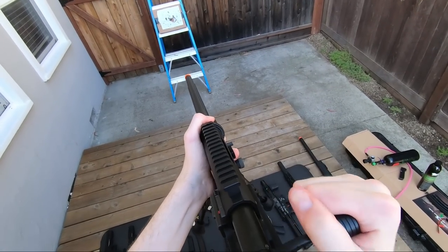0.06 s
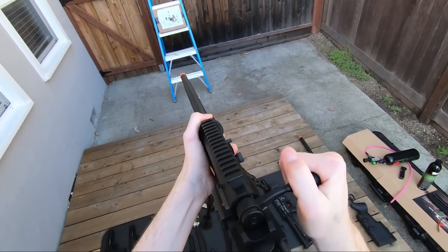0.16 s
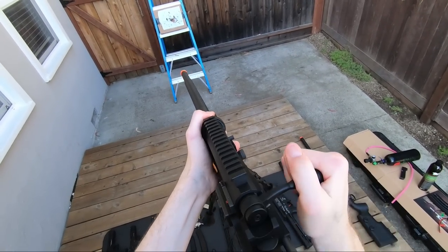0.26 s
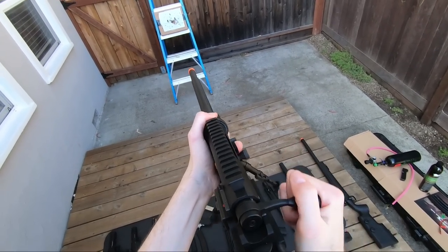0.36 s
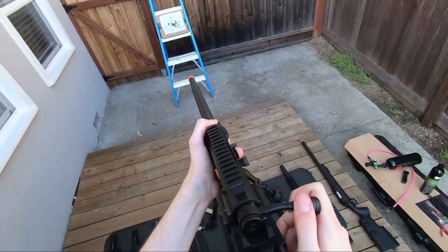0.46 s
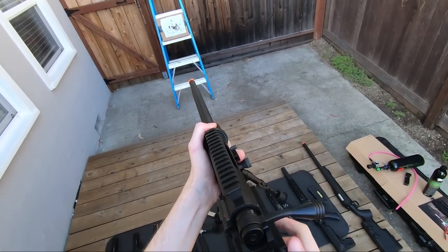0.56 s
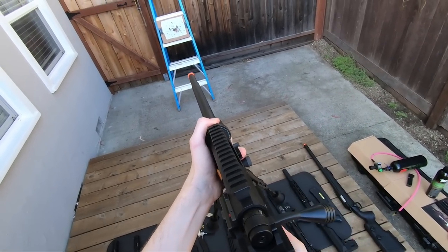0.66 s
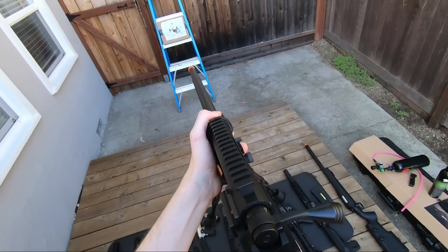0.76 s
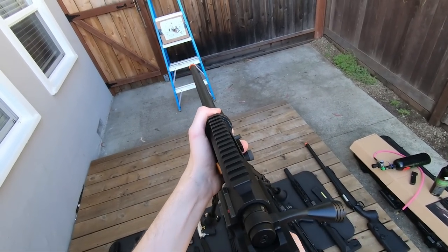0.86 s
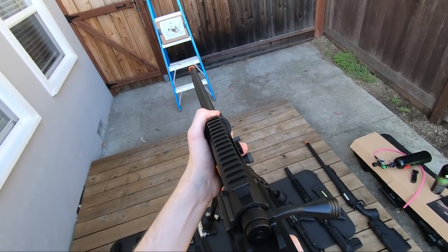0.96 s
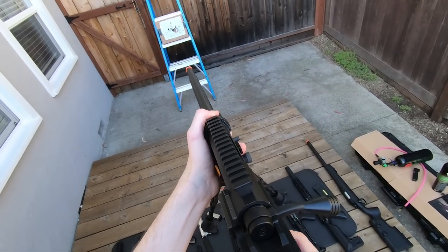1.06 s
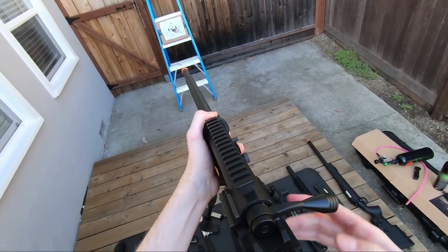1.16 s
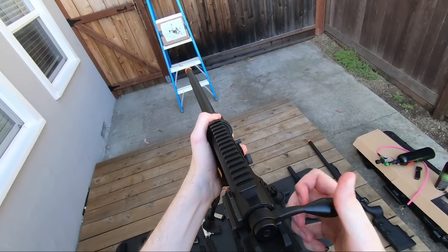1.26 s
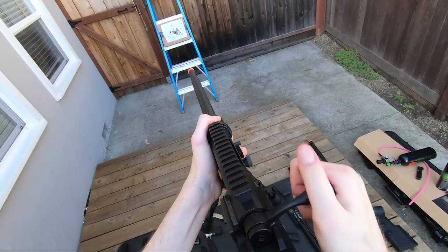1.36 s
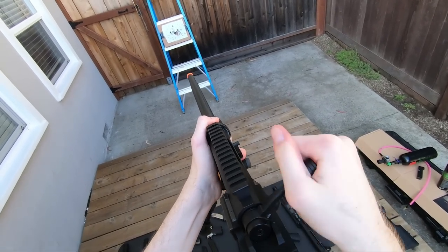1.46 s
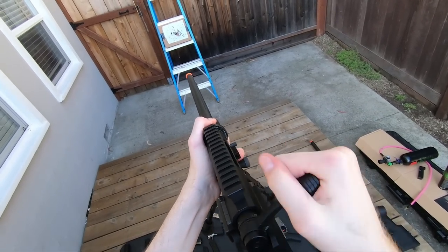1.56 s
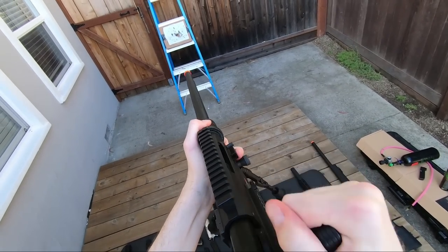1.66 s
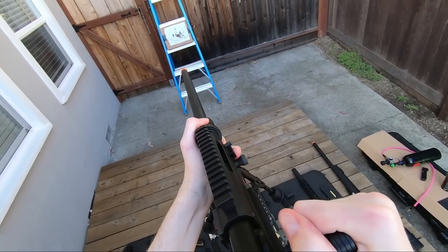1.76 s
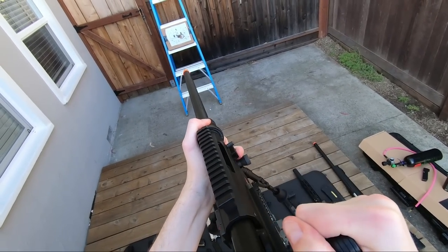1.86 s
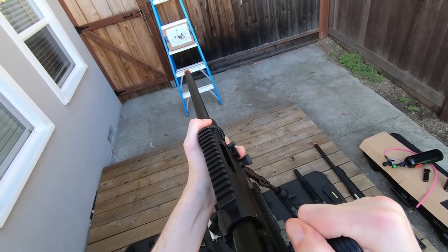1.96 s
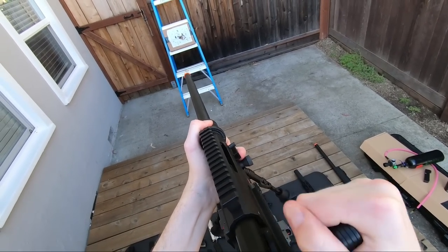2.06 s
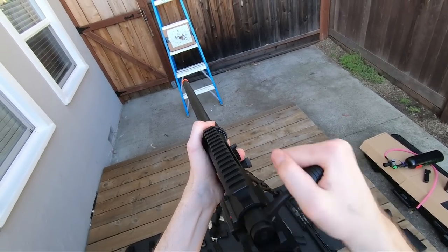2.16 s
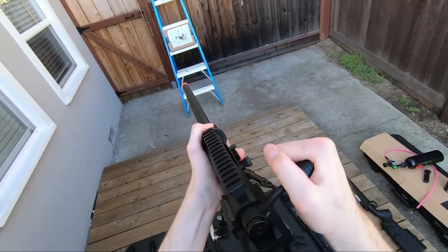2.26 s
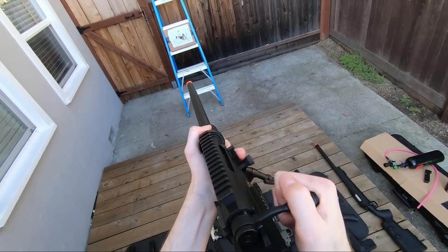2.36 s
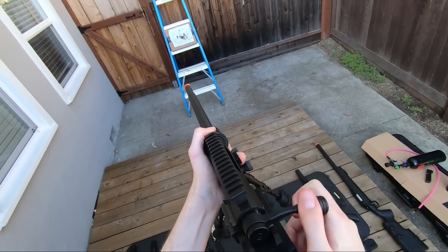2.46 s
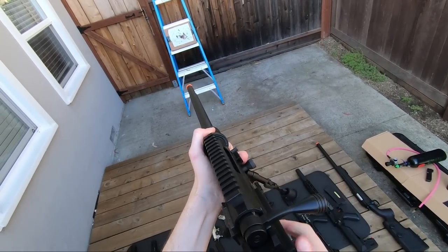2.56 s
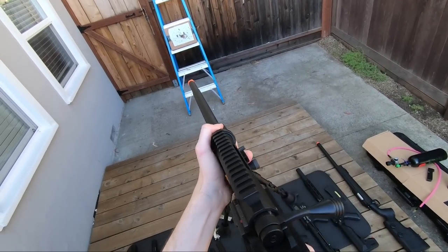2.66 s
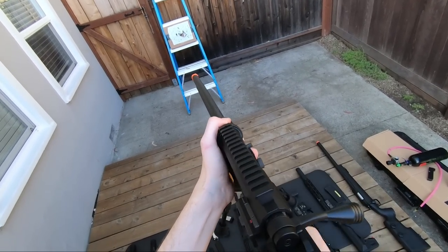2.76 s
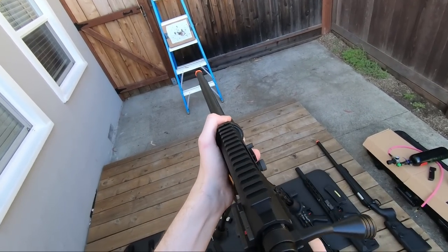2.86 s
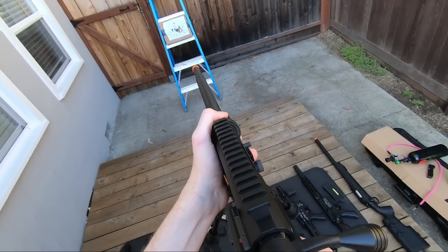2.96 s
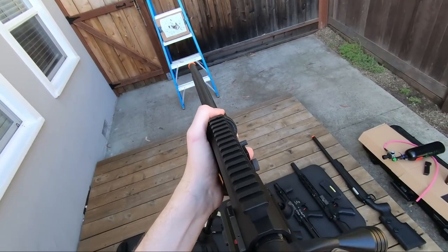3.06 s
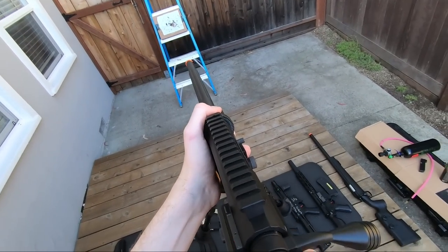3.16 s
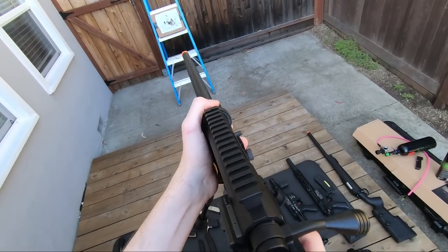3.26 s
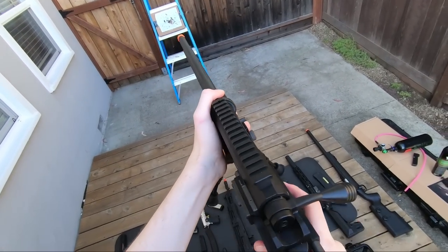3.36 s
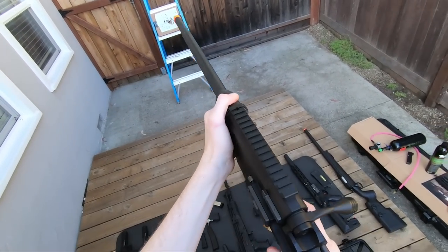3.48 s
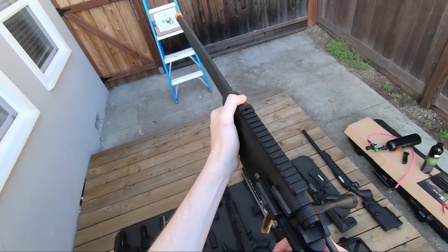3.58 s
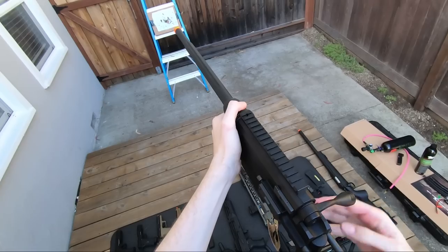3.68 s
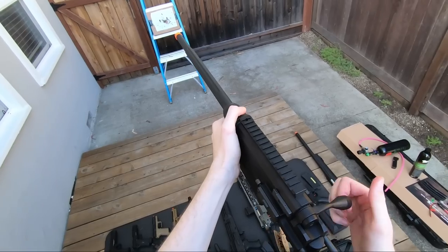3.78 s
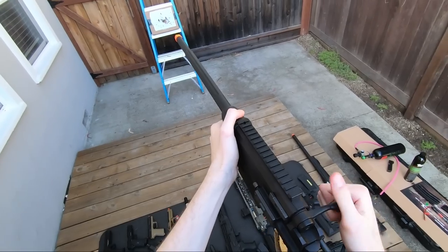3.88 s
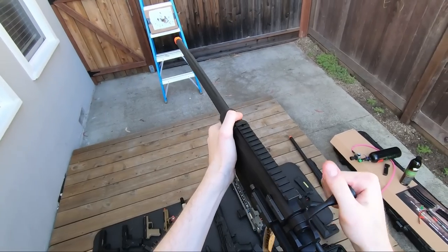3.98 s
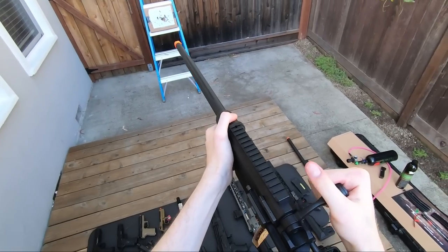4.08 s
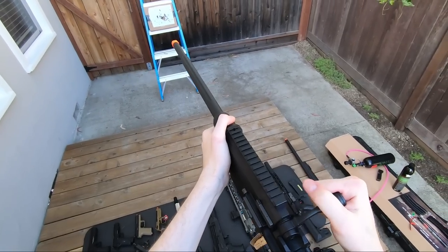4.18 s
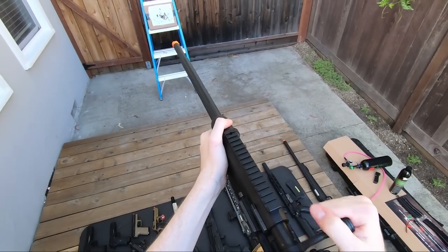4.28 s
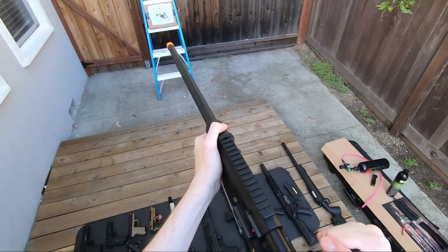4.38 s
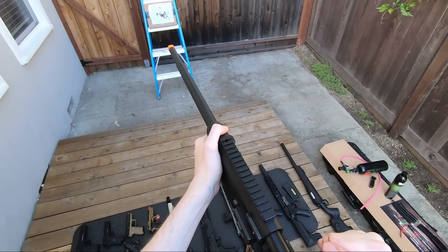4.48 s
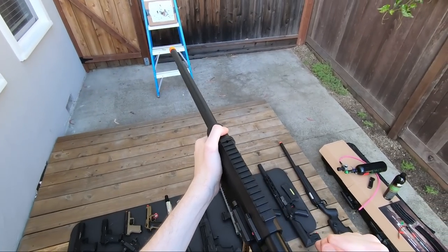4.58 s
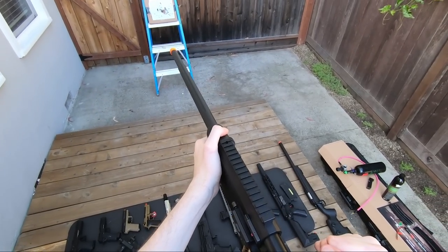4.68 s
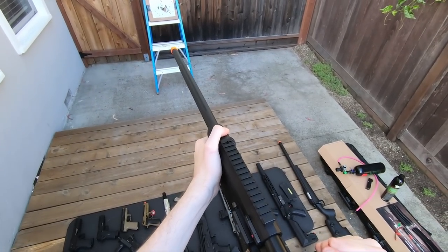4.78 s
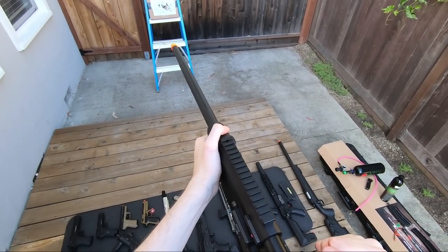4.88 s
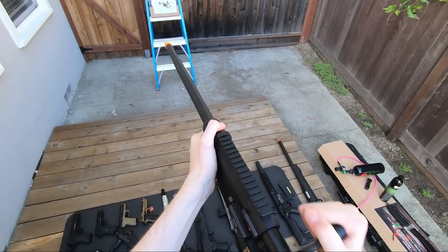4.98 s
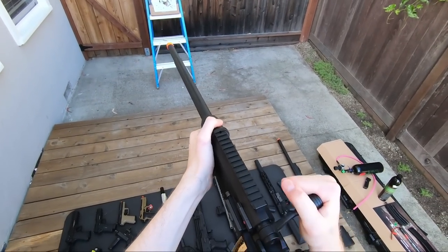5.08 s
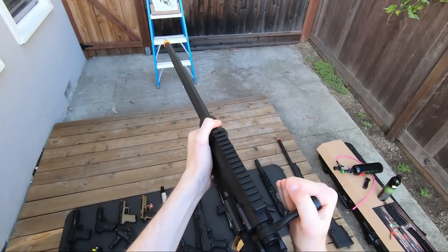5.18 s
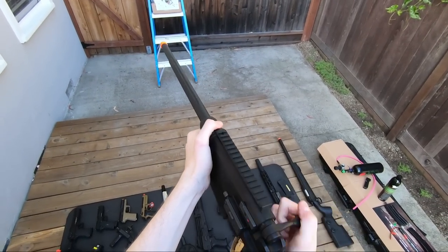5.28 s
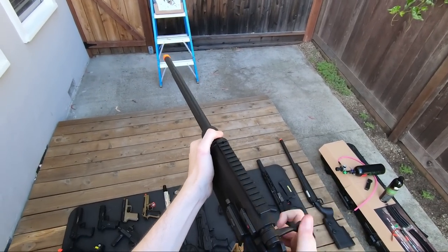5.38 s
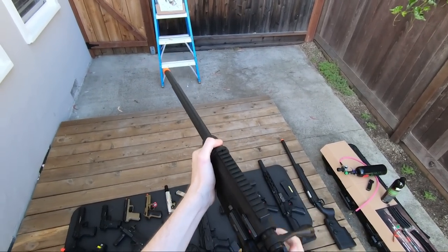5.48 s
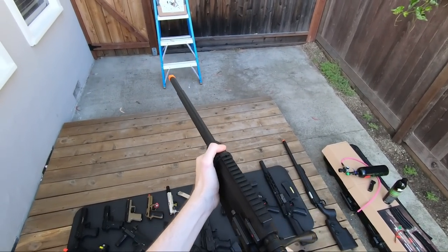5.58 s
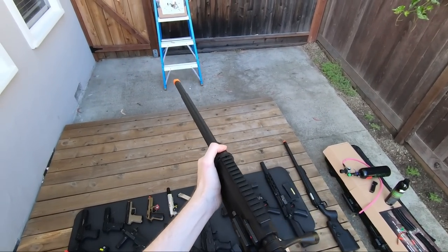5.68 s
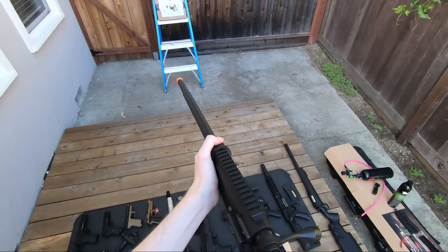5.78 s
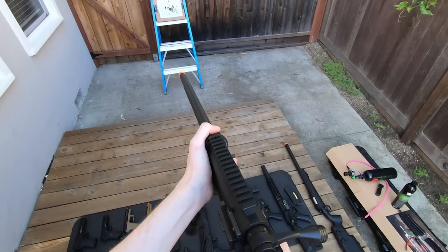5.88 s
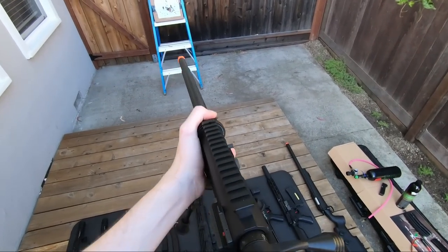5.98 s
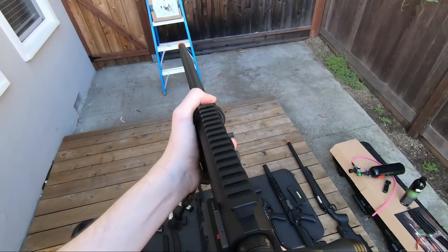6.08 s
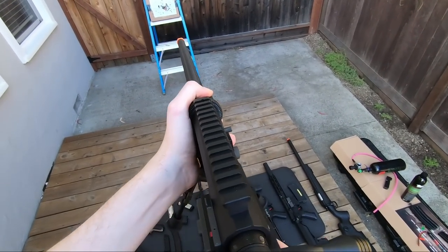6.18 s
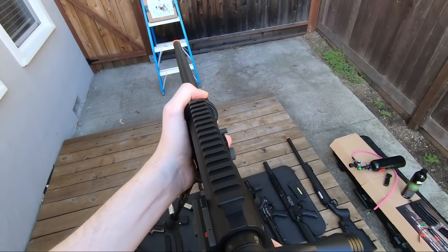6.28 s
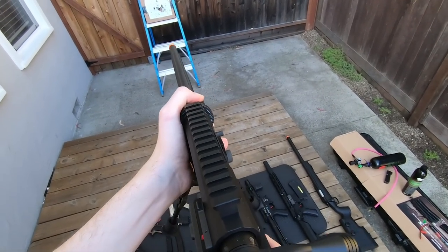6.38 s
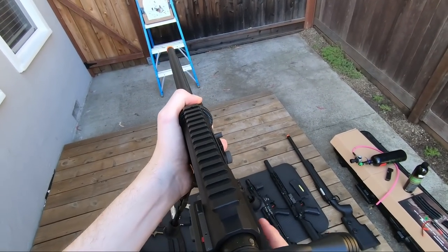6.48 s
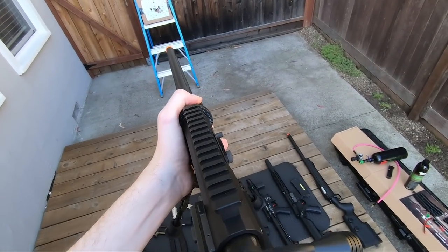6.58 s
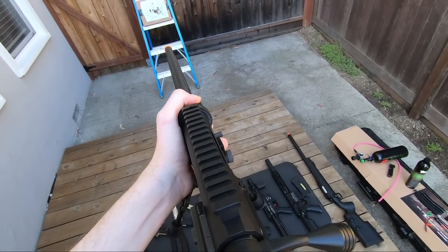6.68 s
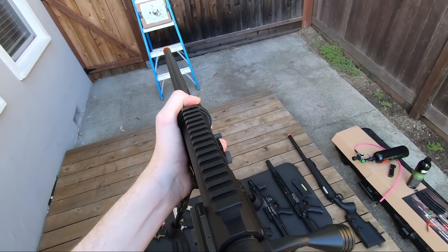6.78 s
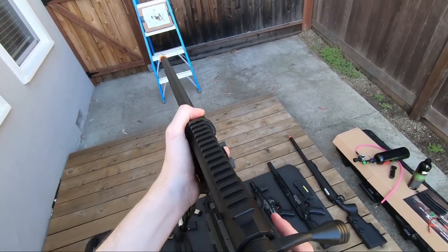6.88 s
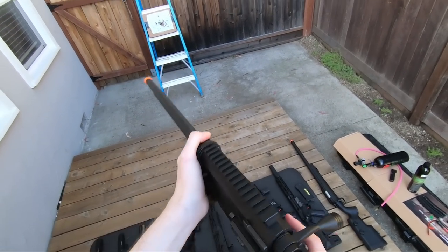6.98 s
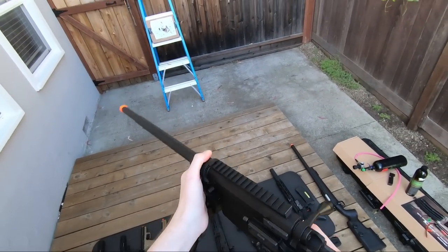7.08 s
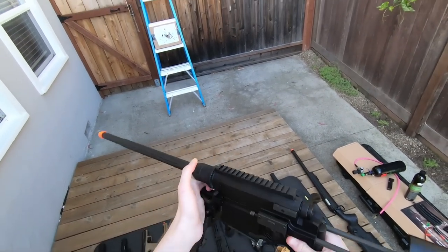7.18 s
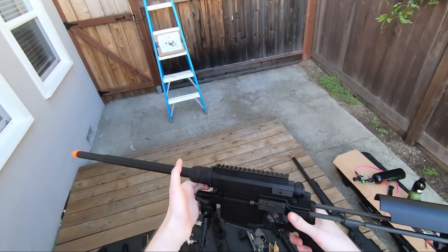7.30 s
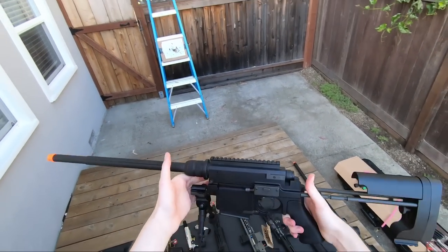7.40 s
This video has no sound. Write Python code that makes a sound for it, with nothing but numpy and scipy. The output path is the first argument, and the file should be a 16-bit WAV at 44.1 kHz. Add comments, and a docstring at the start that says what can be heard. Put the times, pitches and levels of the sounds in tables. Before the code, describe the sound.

Outdoors on a deck between wall and fences, a close stereo microphone catches dry bolt-action handling: scrapes, double clacks, small handle clicks and loose ticks. Three loud piston slams with a short air pop punctuate the cycles, the last after a longer pause. Their peaks overload slightly and bounce off the yard. A fading distant drone, soft hiss, air rumble and a few thin bird notes lie underneath.

```python
"""A spring airsoft rifle close by in a fenced yard: first its bolt slides home and locks, then it is dry-fired.
Two more rounds follow: the bolt is drawn back, caught, pushed home and locked, then the trigger lets the piston slam.
Clicks and scrapes are bursts of noise that shake the rifle's resonances; a slam adds ringing tones and a puff of air.
The yard answers with echoes. Behind it all a traffic drone sinks from the start, air rumbles and gusts,
and from about 1.5 s a faint bird gives thin whistles made from gliding sines."""
import sys
import numpy as np
from scipy import signal
from scipy.io import wavfile
from scipy.ndimage import uniform_filter1d

SR = 44100
rng = np.random.default_rng(int(sys.argv[2]) if len(sys.argv) > 2 else 0)


def put_to_file(sound):
    """Save the sound as 16-bit audio at rate SR, in the file named by the first command-line argument."""
    columns = np.atleast_2d(sound).T  # one column per channel
    safe = np.clip(columns, -1, 1)
    whole_steps = np.round(safe * 32767)
    wavfile.write(sys.argv[1], SR, whole_steps.astype(np.int16))


N = 328096
TIME = np.arange(N) / SR  # seconds

# All levels are relative: each source also has its own overall level.
# Thud, knock and crack say how strongly a force drives the low, middle and high resonances.

# piston hits the cylinder head: start_s, slam_db, pop_db
SHOTS = [(1.0293, -11, -3.5), (3.203, -11, -2), (6.6914, -11.5, -2.5)]
# resonances of receiver, bolt and barrel: pitch_hz, width_hz, level_db
RIFLE_MODES = [(410.9, 520, -19.5), (754, 230, -9.5), (966, 220, -7.5), (1229, 350, -8.5), (1757, 272, -6),
               (2221.6, 393, -5), (2729.2, 304, -0.5), (3167, 332.5, 0), (3666, 396, -1.5),
               (4062.4, 466, -3.5), (4987, 950, -11.5), (6634, 760, -16), (7430, 600, -19),
               (8858, 840, -18.5), (9719, 600, -19), (13270, 2500, -24.5)]
# left-right likeness of the rifle's chatter: pitch_hz, correlation (no unit)
RIFLE_LIKENESS = [(500, .8), (1000, 0.2), (2000, .85), (3300, .9), (5000, 0.75), (9000, 0.13)]
# muzzle pop and hollow stock: pitch_hz, level_db, t60_s (time to fall by 60 dB)
POP_MODES = [(245.8, 2, 0.0215), (795, 1, 0.01385), (155.5, -12.5, .10), (281.5, -20.5, 0.19),
             (351.5, -15.5, 0.12), (657, -24, .05), (900, -30.5, 0.045), (60, -18.5, 0.067)]
# main spring buzzing after release: pitch_hz, level_db, t60_s
SPRING_MODES = [(3120, -46.5, 0.15), (5740, -60.5, .25), (9570, -51.5, .3), (10040, -54.5, .3)]
# colour of the air leaving the muzzle: pitch_hz, level_db
BLAST_SPECTRUM = [(120, 3.5), (300, 5.5), (480, -8), (700, 0.5), (1200, 6), (2000, -0.5), (3500, -4.5),
                  (6000, -3.5), (10000, -16.5), (16000, -9.5)]

# bolt drawn back against the spring: start_s, level_db, scrape_db
DRAWS = [(1.663, -17.5, -26.5), (4.3201, -18.5, -33.5)]
# taking up the spring, then a tick and a click over the sear: delay_s, level_db, thud_db, knock_db, crack_db
DRAW_CLICKS = [(0, -0.5, 3.5, 3.5, 2.5), (0.0415, -9.5, 2, 0.5, 15.5), (0.0495, 0, 2, -1.5, -7)]
# last click, near the end of the draw's scrape: start_s, level_db, thud_db, knock_db, crack_db
DRAW_ENDS = [(1.7519, -18, -22.5, 3, -1), (4.4395, -20, -12, -5.5, -10)]
# sear catches the bolt and bounces: start_s, level_db, bounce_gap_s, loss_per_bounce_db
CATCHES = [(1.9616, -8.5, 0.0041, 6.5), (4.4885, -12.5, .0033, 0.5)]
# bolt breaks free and glides forward: start_s, level_db, knock_db, crack_db, scrape_db, ring_db
PUSHES = [(0.1217, -11, -10, -3.5, -49.5, -38.5), (2.15, -10, -8, -9, -43, -38.5),
          (5.0186, -12, -6.5, -2.5, -37, -27.5)]
# ringing tube of the bolt: pitch_hz, level_db, t60_s
BOLT_MODES = [(2740, 0.5, .16), (3340, -9.5, .05)]
# bolt rams home and rebounds: start_s, level_db, crack_db, rebound_delay_s, rebound_db,
# rebound_thud_db, bump_db, scrape_db
HOMES = [(0.2457, -11.5, 11, 0.00508, -17, 15.5, -22.5, -26),
         (2.259, -12, 10.5, 0.00685, -21, 19, -30, -29.5),
         (5.1107, -11, 7, .0075, -19.5, 17.5, -35.5, -32.5)]
# handle turns down and chatters: start_s, level_db, bounce_gap_s, loss_per_bounce_db (negative grows)
LOCKS = [(0.4283, -30.5, 0.0046, -3), (2.4574, -19.5, .0043, 3), (5.3565, -17.5, .0037, 2.5)]
# handle seats in its notch: start_s, level_db, thud_db, knock_db, crack_db
SEATS = [(0.4588, -31, 1, 21.5, -2.5), (2.486, -32, 6, 25, 1.5), (5.39, -21.5, 0.5, 12.5, -1)]
# handle knocks against its stop: start_s, level_db, thud_db, knock_db, crack_db
KNOCKS = [(0.6163, -26, 8.5, 13.5, 1.5), (4.0711, -17.5, -2, -3, -9), (4.076, -28.5, 5.5, 15.5, -1),
          (5.594, -26, 9.5, 9.5, 1)]
# trigger is pulled: start_s, level_db
TRIGGERS = [(1.0025, -17.5), (3.1817, -17.5), (6.6692, -19)]
# trigger springs back: start_s, level_db, thud_db, knock_db, crack_db
RELEASES = [(1.16, -29, -16, 2.5, 1.5), (3.3433, -25, -9.5, -6, -6.5), (6.889, -24.5, -4.5, 0, -3.5)]
# loose fittings tick as the grip shifts: start_s, level_db, knock_db, crack_db
TICKS = [(0.4913, -36, -5.5, -2), (0.571, -39, -17.5, -9), (1.3987, -39, 9, 4.5), (1.446, -45, 0.5, 3.5),
         (1.4934, -38, 4, 3.5), (1.6057, -47, 24.5, 2), (1.811, -39.5, 3.5, 10.5),
         (2.3769, -37.5, -1.5, -3), (3.5685, -39.5, -13, 3.5), (3.665, -35, -21, -9.5),
         (4.0636, -33, 1, -2.5), (4.1352, -40, -9, -0.5), (5.313, -37, -3, -4.5), (6.648, -49.5, -1.5, 2),
         (7.1063, -51, -10, -9.5), (7.1642, -57, -2, -7), (7.31, -45.5, -5.5, 5), (7.3446, -48.5, -3, 0),
         (7.3876, -37.5, 9, -1.5)]
# hand rubs along handle and grip: start_s, length_s, level_db, crack_db
HANDLING = [(0.437, 0.0568, -48, 1), (1.388, 0.181, -52, 8), (2.468, 0.061, -45.5, 7.5),
            (2.66, 0.282, -59, 4.5), (3.471, 0.553, -65, -5.5), (5.565, 0.037, -43.5, -10.5),
            (6.392, 0.148, -65.5, 9.5), (7.332, 0.116, -57, 3.5)]

# colour of each kind of contact: thud_db, knock_db, crack_db
CATCH_COLOUR = (-7.5, -2.5, -6)
BUMP_COLOUR = (12, 4.8, 4)
LOCK_COLOUR = (5.67, 8.8, -5.5)
TRIGGER_COLOUR = (-5, -3.7, 0)
SCRAPE_COLOUR = (1, 4, 1)
TAKE_UP_COLOUR = (10, 22, -2.5)
LEAD_IN_COLOUR = (-3.5, 0, -1)
# colour of the hand's contacts: thud_db, knock_db
HAND_COLOUR = (0, 3)

# echoes from deck, wall and fence: pitch_hz, level_db
YARD_DB = [(100, -21), (300, -13), (900, -10.5), (2500, -13), (5000, -13), (9000, -8.5), (15000, -15.5)]
# how long the echoes last: pitch_hz, t60_s
YARD_T60 = [(100, 0.13), (900, .45), (3000, .42), (8000, 0.54), (15000, 0.23)]
# gusts on the microphone: peak_s, level_db, half_length_s
GUSTS = [(0.15, -51.5, 0.32), (0.77, -34.5, 0.317), (1.548, -52, .45), (2.698, -58, .4), (4.7, -54, 0.16)]
# colour of the air rumble: pitch_hz, level_db
WIND_SPECTRUM = [(15, -15), (26, -4), (37, -5), (50, -12.5), (70, -23.5), (110, -29.5), (300, -69)]
# loudness of the air rumble: time_s, level_db
WIND_DB = [(0.0, -42), (0.46, -40.5), (0.97, -39), (1.39, -50.5), (1.84, -39), (2.3, -43.5), (2.69, -43),
           (4.45, -56), (4.74, -47.5), (5.16, -61.5), (6.15, -59), (6.36, -67.5), (6.76, -68),
           (7.44, -69.5)]
# colour of the drone at the start: pitch_hz, level_db
DRONE_NEAR = [(35, -27.5), (65, 1.5), (110, -1), (160, -2.5), (220, -0.5), (300, -20), (500, -31),
              (1200, -55)]
# colour of the drone once it is far off: pitch_hz, level_db
DRONE_FAR = [(35, -31), (65, -22), (100, -18.5), (150, 5), (200, -1.5), (270, 0.5), (360, -18.5),
             (600, -27.5), (1200, -68)]
# colour of far traffic: pitch_hz, level_db
TRAFFIC_SPECTRUM = [(150, -23.5), (330, -2.5), (500, -2), (850, 2), (1250, -2), (1800, -12.5), (3000, -28),
                    (8000, -54.5)]
# loudness of far traffic: time_s, level_db
TRAFFIC_DB = [(0.0, -37.5), (1.01, -45), (1.18, -49.5), (3.17, -47), (3.48, -51), (4.29, -49.5),
              (6.82, -53.5), (6.94, -58), (7.44, -53)]
# colour of the far hiss: pitch_hz, level_db
HISS_SPECTRUM = [(900, -19.5), (2000, -0.5), (3200, -1.5), (4800, -5), (6500, -12.5), (10000, -22),
                 (12000, -40), (16000, -45.5)]
# loudness of the far hiss: time_s, level_db
HISS_DB = [(0, -50.5), (0.8, -56), (2.0, -59.5), (2.8, -60.5), (4.2, -62), (5.3, -64.5), (5.95, -63),
           (6.35, -71.5), (7.44, -71)]
# left-right likeness of the outdoor noise: pitch_hz, correlation (no unit)
LIKENESS = [(30, .94), (200, 0.9566), (500, 0.84), (1000, 0.25), (2500, 0.48), (5000, 0.73), (12000, 0.071)]
# thin bird whistles: start_s, length_s, pitch_hz, level_db
BIRD = [(1.493, 0.113, 5130, -58), (2.06, 0.078, 5450, -61), (2.625, .11, 5130, -64),
        (3.881, 0.148, 5200, -67.5), (4.278, 0.074, 5130, -58.5), (6.333, 0.177, 5050, -65)]

STRIKE_DB, SLIDE_DB = 33.5, 10.5  # force of a click and of a scrape marked 0 dB
LEAD_IN_S, LEAD_IN_DB, LEAD_IN_RISE_DB = 0.015, -15, 15.5  # short scrape before a push or a catch
TAKE_UP_S, TAKE_UP_DB, TAKE_UP_RISE_DB = 0.03, -15.5, 14.5  # longer scrape as the draw begins
HOME_THUD_DB, HOME_KNOCK_DB = 1.5, 7
REBOUND_KNOCK_DB, REBOUND_CRACK_DB = 3, 11
BUMP_LEAD_S, SWELL_DB = 0.0455, 4.5  # bump this long before home; the scrape then grows this much
HANDLING_TICKS_PER_S, HANDLING_TICK_DB = 14, 4  # tick level against the rub
DRONE_END_DB, DRONE_EXCESS_DB, DRONE_FADE_S = -53, 20, 2.198  # steady level, extra at the start, fade


def from_db(db):
    """Turn decibels into a gain."""
    return 10 ** (np.asarray(db) / 20)


def rms_one(x):
    """Scale a sound to an average strength (rms) of 1."""
    return x / np.sqrt(np.mean(x ** 2) + 1e-20)


def at_hz(points, hz):
    """Read a table of pitch and value between its points, on a log-pitch axis."""
    points = np.array(points)
    return np.interp(np.log(hz), np.log(points[:, 0]), points[:, 1])


def over_time(points):
    """Turn a table of time and decibels into a gain curve."""
    return from_db(np.interp(TIME, *np.transpose(points)))


def butter(x, hz, kind, order=2):
    """Filter a sound, smoothly keeping lows, highs or a band."""
    sos = signal.butter(order, np.clip(hz, 10, 0.45 * SR), kind, fs=SR, output="sos")
    return signal.sosfilt(sos, x + 1e-18)


def add(track, s, sound):
    """Mix a sound into a track at time s, in seconds."""
    at = int(np.clip(round(s * SR), 0, N - 1))
    track[..., at:at + sound.shape[-1]] += sound[..., :N - at]


def slow(size, order):
    """Make a slow random wander of strength 1 by averaging noise over `order` samples."""
    noise = rng.standard_normal(size + 8 * order)
    return rms_one(uniform_filter1d(noise, size=order))[:size]


def stereo(pair, alike):
    """Blend two unrelated noises into left and right with a chosen correlation."""
    alike = np.clip(alike, -1, 1)
    middle = np.sqrt(1 + alike) * pair[0]
    side = np.sqrt(1 - alike) * pair[1] * [[1], [-1]]
    return (middle + side) / np.sqrt(2)


def noise_bands(size):
    """Split outdoor noise into half-octave bands, each given as (centre Hz, stereo noise)."""
    edges = 16 * 2 ** np.arange(0, 10.1, 0.5)
    centres = np.sqrt(edges[1:] * edges[:-1])
    white = rng.standard_normal((2, 2, size))
    bands = []
    for k, hz in enumerate(centres):
        pair = butter(white[k % 2], edges[k:k + 2], "band")  # neighbours use separate noises
        bands.append((hz, stereo(pair, at_hz(LIKENESS, hz))))
    return bands


def coloured(bands, spectrum):
    """Weigh noise bands by a spectrum table to give noise of strength 1."""
    return rms_one(sum(from_db(at_hz(spectrum, hz)) * band for hz, band in bands))


def ring(modes):
    """One blow sets off fading sines, neighbours in opposite phase."""
    t = TIME[:SR // 2]
    out = np.zeros(len(t))
    for k, (hz, db, t60) in enumerate(modes):
        out += (-1) ** k * from_db(db - 60 * t / t60) * np.sin(2 * np.pi * hz * t)
    return out


def blow(hit_db=-4.0, chatter_db=-0.5, chatter_t60=0.0087, rattle_db=-8.0, rattle_t60=0.075, clump_db=2.5):
    """Force of one contact (mid, side): a sharp hit, brief chatter, then loose parts rattling in clumps."""
    t = TIME[:SR // 16]
    chatter = from_db(-60 * t / chatter_t60)
    rattle = from_db(-60 * t / rattle_t60 + clump_db * slow(len(t), order=50))
    envelope = from_db(chatter_db) * chatter / np.linalg.norm(chatter)
    envelope += from_db(rattle_db) * rattle / np.linalg.norm(rattle)
    hit = from_db(hit_db) * (t == 0) * [[1], [0]]  # one sample, in the middle only
    return hit + envelope * rng.standard_normal((2, len(t)))


def rub(length, start_db, end_db, grain_db=2.5, stick_db=2.5):
    """Force of sliding (mid, side): tiny uneven slips, bunched as the part sticks and frees."""
    size = max(int(length * SR), 2)
    grains = np.minimum(rng.exponential(1, size), 5)
    sizes_db = grain_db * grains + stick_db * slow(size, order=70)
    slips = rms_one(rng.standard_normal((2, size)) * from_db(sizes_db))
    return slips * from_db(np.linspace(start_db, end_db, size))


def click(s, db, colour):
    """One part hits another, as a single force on the rifle."""
    return [(s, from_db(STRIKE_DB + db) * blow(), *colour)]


def bounces(s, db, gap_s, loss_db, colour, count=3):
    """A part hits its stop several times in quick succession."""
    forces = []
    for k in range(count):
        forces += click(s + k * gap_s, db - k * loss_db, colour)
    return forces


def scrape(start, end, db, rise_db, colour):
    """One part slides on another, its force changing by rise_db to end at db."""
    return [(start, rub(end - start, SLIDE_DB + db - rise_db, SLIDE_DB + db), *colour)]


def rifle(forces):
    """Forces shake the rifle's resonances; where they act sets their thud, knock and crack."""
    out = np.zeros((2, N))
    for k, (hz, width, db) in enumerate(RIFLE_MODES):
        drive = np.full((2, N), 1e-18)
        for s, force, thud_db, knock_db, crack_db in forces:
            colour = [(1000, thud_db), (1900, knock_db), (2900, 0.0091), (4100, 0.00052), (7500, crack_db)]
            add(drive, s, force * from_db(db + at_hz(colour, hz)))
        # a two-pole resonator: a wider mode dies sooner
        r = np.exp(-np.pi * width / SR)
        feed = [(1 - r * r) / 2, 0, (r * r - 1) / 2]
        feedback = [1, -2 * r * np.cos(2 * np.pi * hz / SR), r * r]
        mode = signal.lfilter(feed, feedback, drive)
        out += (-1) ** k * stereo(mode, at_hz(RIFLE_LIKENESS, hz))
    return out


def piston(strike_db=32.5, rush_s=0.0062, rush_db=0.0, release_s=0.013, release_db=-24.5,
           bounce_s=0.0026, bounce_db=-16.0):
    """The sear lets go, the piston rasps down the cylinder, slams into its head and bounces once."""
    forces = []
    for s, db, _ in SHOTS:
        release = rub(release_s - rush_s, release_db, release_db + 6)
        rush = rub(rush_s * 0.85, rush_db, rush_db + 2.5)
        slam = from_db(strike_db + db) * blow()
        bounce = from_db(strike_db + db + bounce_db) * blow()
        # each force ends with its thud, knock and crack in dB
        forces += [(s - release_s, release, 24, 2, 5), (s - rush_s, rush, 8, -1, 10),
                   (s, slam, 4, 0, 7), (s + bounce_s, bounce, 6, 0, 16)]
    return forces


def spring_rattle(start_db=-40.0, fall_db=18.5, length_s=0.3, colour=(-4.0, 0.0, 6.5)):
    """After each slam the slack spring shivers against the cylinder wall and fades."""
    forces = []
    for s, *_ in SHOTS:
        forces += scrape(s, s + length_s, start_db - fall_db, -fall_db, colour)
    return forces


def muzzle_and_spring():
    """Each slam drives a pop of air out of the barrel and leaves stock and spring ringing."""
    out = np.zeros(N)
    sound = ring(POP_MODES) + ring(SPRING_MODES)
    for s, _, pop_db in SHOTS:
        add(out, s, from_db(pop_db) * sound)
    return out


def muzzle_blast(blast_db=-5.5, blast_t60=0.035):
    """Turbulent air leaves the muzzle as a broad, quickly fading puff of noise."""
    t = TIME[:SR // 8]
    out = np.zeros((2, N))
    for s, _, pop_db in SHOTS:
        puff = coloured(noise_bands(len(t)), BLAST_SPECTRUM)
        add(out, s, puff * from_db(blast_db + pop_db - 60 * t / blast_t60))
    return out


def bolt():
    """The hand works the action: parts click against their stops and scrape in between."""
    return draw_back() + push_home() + handle_and_trigger() + handling()


def draw_back(rise_db=-2.5, overrun_s=0.012):
    """The bolt takes up the spring, scrapes back over the sear and is caught."""
    forces = []
    for (s, db, scrape_db), (end, end_db, *end_colour) in zip(DRAWS, DRAW_ENDS):
        forces += scrape(s - TAKE_UP_S, s, db + TAKE_UP_DB, TAKE_UP_RISE_DB, TAKE_UP_COLOUR)
        for delay, part_db, *colour in DRAW_CLICKS:
            forces += click(s + delay, db + part_db, colour)
        slide_start = s + DRAW_CLICKS[-1][0]
        forces += scrape(slide_start, end + overrun_s, scrape_db, rise_db, SCRAPE_COLOUR)
        forces += click(end, end_db, end_colour)
    for s, db, gap_s, loss_db in CATCHES:
        forces += scrape(s - LEAD_IN_S, s, db + LEAD_IN_DB, LEAD_IN_RISE_DB, LEAD_IN_COLOUR)
        forces += bounces(s, db, gap_s, loss_db, CATCH_COLOUR)
    return forces


def push_home(thud_db=-8.0):
    """The bolt breaks free, glides forward, bumps into the chamber, rams home and rebounds."""
    forces = []
    for (s, db, knock_db, crack_db, glide_db, _), (home, *_) in zip(PUSHES, HOMES):
        forces += scrape(s - LEAD_IN_S, s, db + LEAD_IN_DB, LEAD_IN_RISE_DB, LEAD_IN_COLOUR)
        forces += click(s, db, (thud_db, knock_db, crack_db))
        forces += scrape(s, home - BUMP_LEAD_S, glide_db, 0, SCRAPE_COLOUR)
    for s, db, crack_db, rebound_s, rebound_db, rebound_thud_db, bump_db, scrape_db in HOMES:
        bump, rebound = s - BUMP_LEAD_S, s + rebound_s
        forces += click(bump, bump_db, BUMP_COLOUR)
        forces += scrape(bump, rebound, scrape_db, SWELL_DB, SCRAPE_COLOUR)
        forces += click(s, db, (HOME_THUD_DB, HOME_KNOCK_DB, crack_db))
        forces += click(rebound, rebound_db, (rebound_thud_db, REBOUND_KNOCK_DB, REBOUND_CRACK_DB))
    return forces


def bolt_ring():
    """The bolt's tube rings on as fading sines after it breaks free."""
    out = np.zeros(N)
    sound = ring(BOLT_MODES)
    for s, *_, ring_db in PUSHES:
        add(out, s, from_db(ring_db) * sound)
    return out


def handle_and_trigger():
    """The handle locks down, seats or knocks on its stop; the trigger clicks in and out."""
    forces = []
    for s, db, gap_s, loss_db in LOCKS:
        forces += bounces(s, db, gap_s, loss_db, LOCK_COLOUR)
    for s, db, *colour in SEATS + KNOCKS + RELEASES:
        forces += click(s, db, colour)
    for s, db in TRIGGERS:
        forces += click(s, db, TRIGGER_COLOUR)
    return forces


def handling(spread_db=3.5, rise_db=0.0):
    """The hand shifts on the rifle: soft rubbing, with loose fittings ticking at random."""
    forces = []
    for s, db, knock_db, crack_db in TICKS:
        forces += click(s, db, (HAND_COLOUR[0], knock_db, crack_db))
    for start, length, db, crack_db in HANDLING:
        colour = (*HAND_COLOUR, crack_db)
        forces += scrape(start, start + length, db, rise_db, colour)
        count = round(length * HANDLING_TICKS_PER_S)
        for when, strength in rng.random((count, 2)):
            tick_db = db + HANDLING_TICK_DB + spread_db * (2 * strength - 1)
            forces += click(start + when * length, tick_db, colour)
    return forces


def yard(x, first_s=0.0055, near_db=5.5, near_t60=0.21, clump_db=3.0):
    """Deck and wall answer quickly, then a thinner tail between the fences; it shifts as the rifle moves."""
    t, hop, shift = TIME[:SR * 5 // 8], SR // 2, SR // 16
    starts = range(-hop, N, hop)
    tails = []
    for hz, band in noise_bands(len(t) + len(starts) * shift):
        far = from_db(-60 * t / at_hz(YARD_T60, hz))
        near = from_db(near_db - 60 * t / near_t60)
        decay = (far + near) * (t > first_s)
        tails.append((band, from_db(at_hz(YARD_DB, hz)) * decay / np.linalg.norm(decay)))
    out, mono = np.zeros((2, N)), x.mean(axis=0)
    for k, start in enumerate(starts):
        # overlapping pieces of sound each meet a later stretch of the echo noise
        at = np.arange(max(start, 0), min(start + 2 * hop, N))
        piece = mono[at] * np.sin(np.pi * (at - start) / (2 * hop))
        response = sum(band[:, k * shift:k * shift + len(t)] * decay for band, decay in tails)
        response = response * from_db(clump_db * slow(len(t), order=60))
        add(out, at[0] / SR, signal.fftconvolve(piece[None], response, axes=1))
    return out


def gusts(low_hz=55, high_hz=110, calm_db=-74.5):
    """Gusts swell out of a light breeze and sink, thumping on both microphone ports together."""
    strength = from_db(calm_db)
    for s, db, half_s in GUSTS:
        strength = strength + from_db(db) * np.exp(-((TIME - s) / half_s) ** 2)
    return strength * rms_one(butter(rng.standard_normal(N), [low_hz, high_hz], "band"))


def background(wind_db=-0.5, hum_db=-1.5, hum_hz=36.76, hum_waver_hz=2.0, far_cut_hz=125,
               traffic_db=1.0, gone_s=3.0):
    """Shaped noise makes air rumble, far traffic and hiss; a low hum wavers and a deep drone recedes."""
    bands = noise_bands(N)
    hum_pitch = hum_hz + hum_waver_hz * slow(N, order=6000)
    hum = rms_one(np.sin(2 * np.pi * np.cumsum(hum_pitch) / SR))
    rumble = from_db(wind_db) * coloured(bands, WIND_SPECTRUM) + from_db(hum_db) * hum
    # the drone fades from its near colour to its far one
    far = np.clip(TIME / gone_s, 0, 1)
    far_drone = butter(coloured(bands, DRONE_FAR), far_cut_hz, "high", order=4)
    drone = np.sqrt(1 - far) * coloured(bands, DRONE_NEAR) + np.sqrt(far) * far_drone
    drone_gain = from_db(DRONE_END_DB + DRONE_EXCESS_DB * np.exp(-TIME / DRONE_FADE_S))
    traffic = from_db(traffic_db) * over_time(TRAFFIC_DB) * coloured(bands, TRAFFIC_SPECTRUM)
    hiss = over_time(HISS_DB) * coloured(bands, HISS_SPECTRUM)
    return over_time(WIND_DB) * rumble + drone_gain * drone + traffic + hiss


def bird(drop_hz=400, drop_s=0.01236, waver_hz=110):
    """A far bird: each whistle is a sine that drops onto its note, wavers and fades."""
    out = np.zeros(N)
    for s, length, hz, db in BIRD:
        t = TIME[:int(length * SR)]
        pitch = hz + drop_hz * np.exp(-t / drop_s) + waver_hz * slow(len(t), order=80)
        swell = np.sin(np.pi * np.sqrt(t / length))  # quick rise, slower fade
        whistle = swell * np.sin(2 * np.pi * np.cumsum(pitch) / SR)
        add(out, s, from_db(db) * rms_one(whistle))
    return out


def scene(right_db=0.24, blast_direct_db=-13.5, piston_yard_db=-4.5):
    """The piston is shut inside the rifle; the blast points away and returns off the fence; all leans right."""
    action = rifle(bolt()) + bolt_ring()
    slam = rifle(piston() + spring_rattle())
    pop, blast = muzzle_and_spring(), muzzle_blast()
    direct = action + slam + pop + from_db(blast_direct_db) * blast
    echo = yard(action + from_db(piston_yard_db) * slam + pop + blast)
    mix = direct + echo + gusts() + background() + bird()
    return mix * from_db([[-right_db], [right_db]])


def record(dry, edge_hz=10500, top_db=-14.5, stop_hz=16800):
    """The microphone's treble drops in a step, the loudest peaks overload, then the very top is cut."""
    body = butter(dry, edge_hz, "low", order=12)
    treble = butter(dry, edge_hz, "high", order=12)
    overloaded = np.clip(body + from_db(top_db) * treble, -1, 1)
    top_cut = signal.cheby2(14, 60, stop_hz, fs=SR, output="sos")  # 60 dB down from stop_hz upward
    return signal.sosfilt(top_cut, overloaded)


dry = scene()
out = record(dry)
put_to_file(out)
```